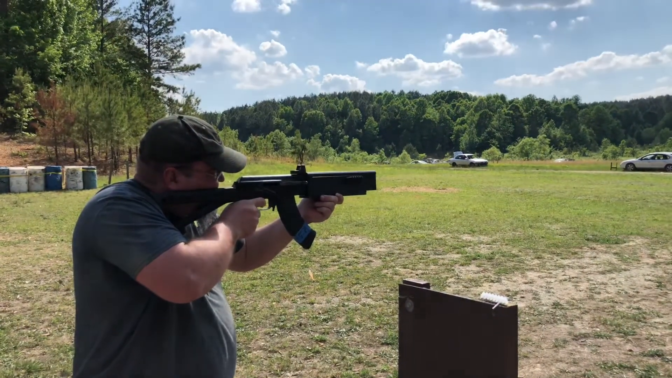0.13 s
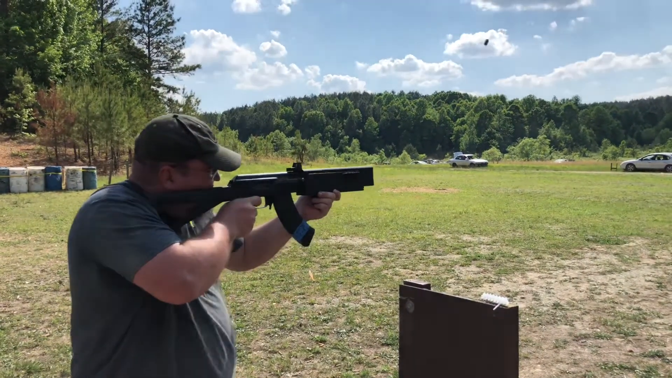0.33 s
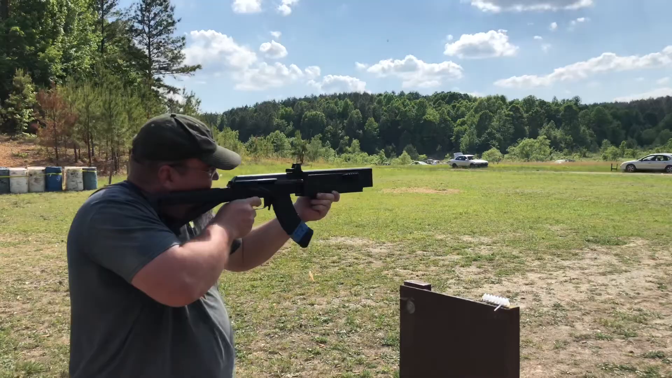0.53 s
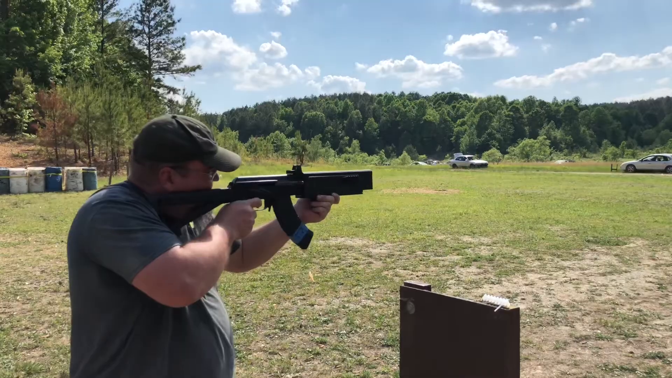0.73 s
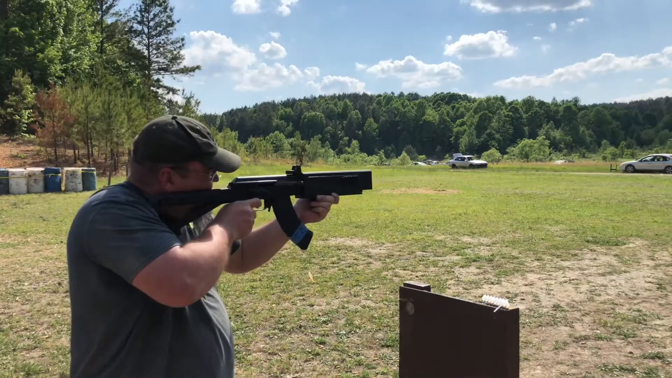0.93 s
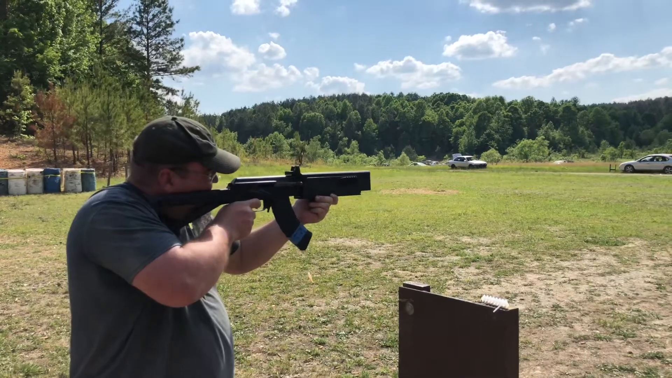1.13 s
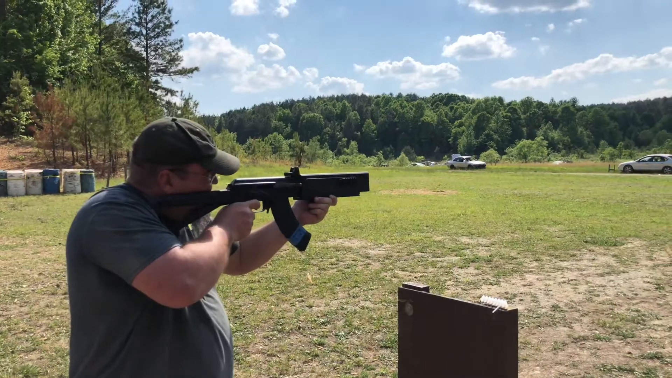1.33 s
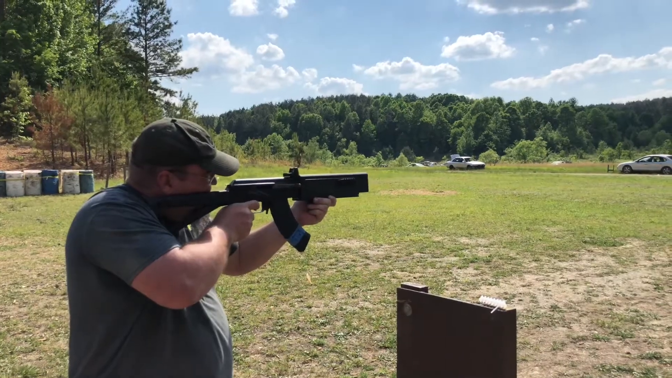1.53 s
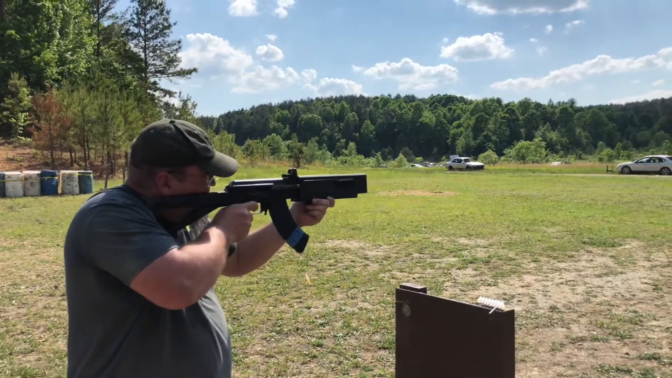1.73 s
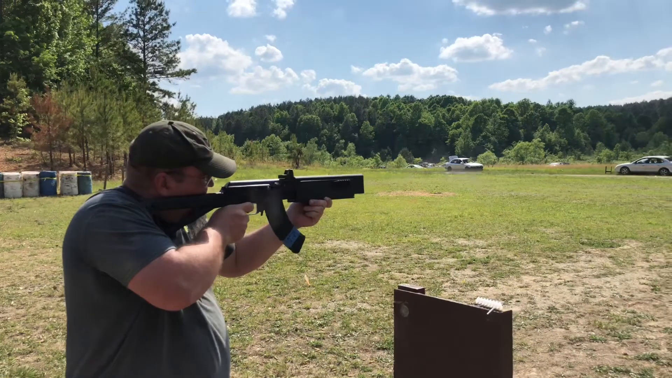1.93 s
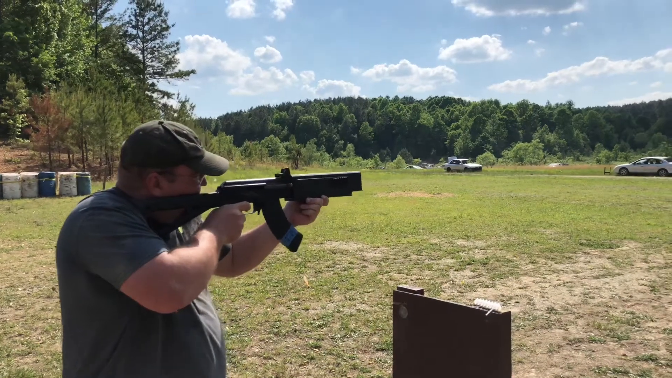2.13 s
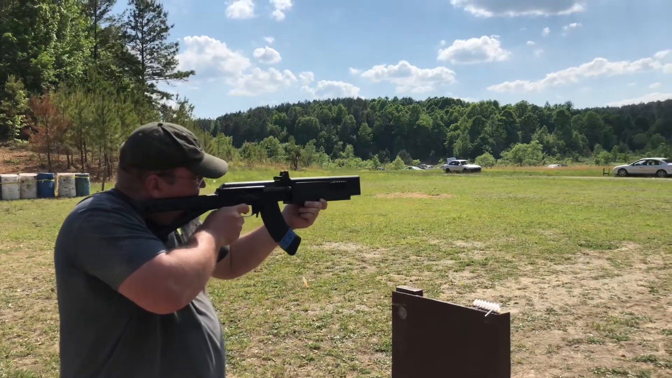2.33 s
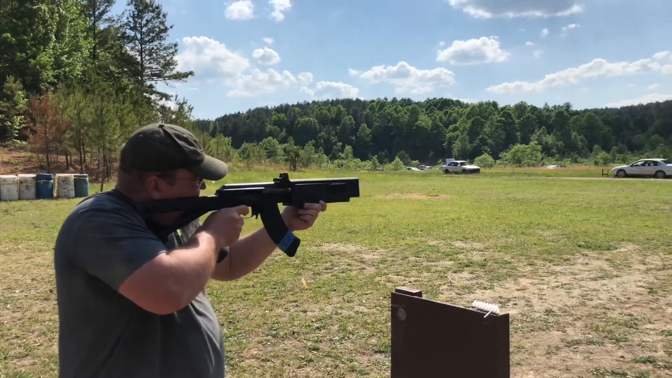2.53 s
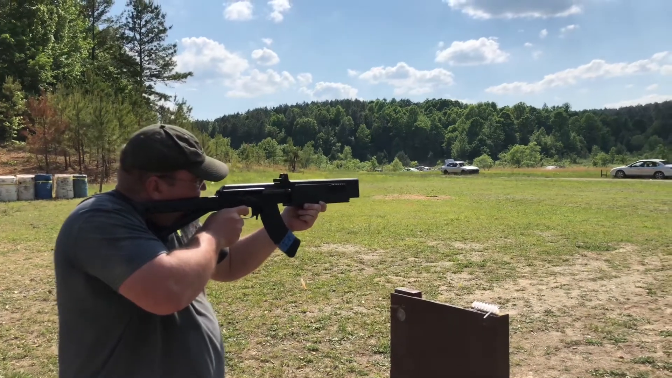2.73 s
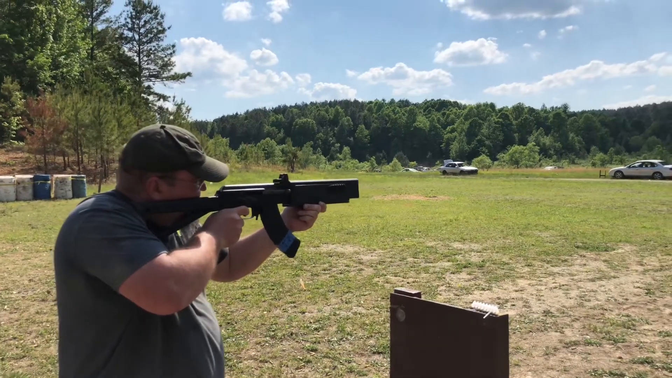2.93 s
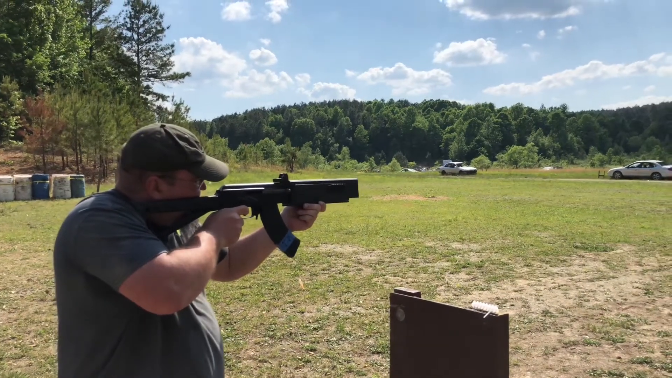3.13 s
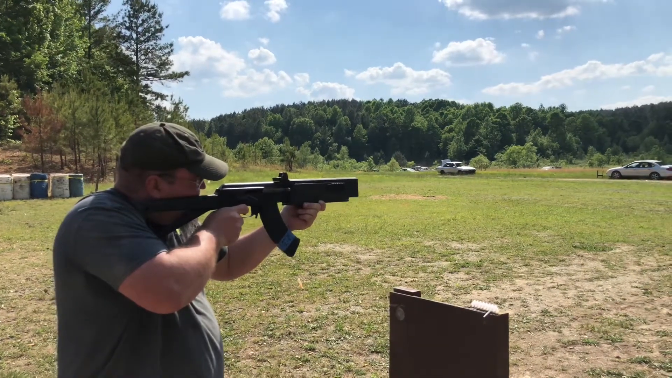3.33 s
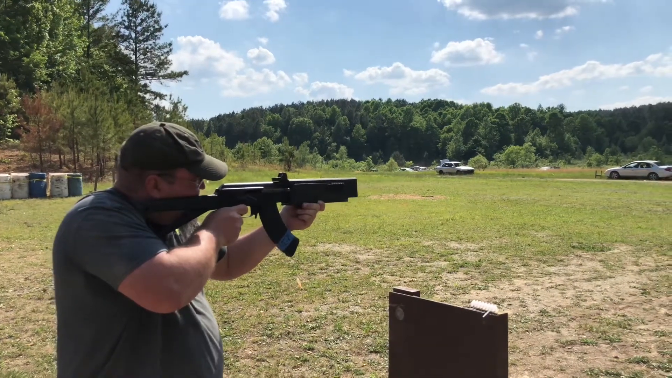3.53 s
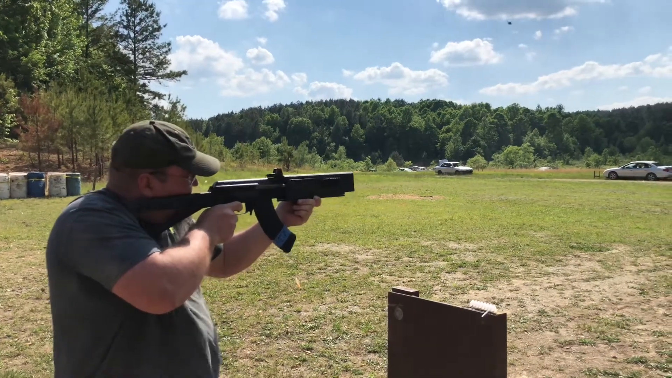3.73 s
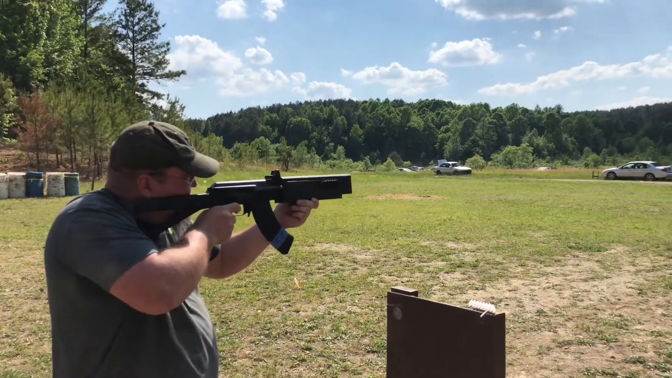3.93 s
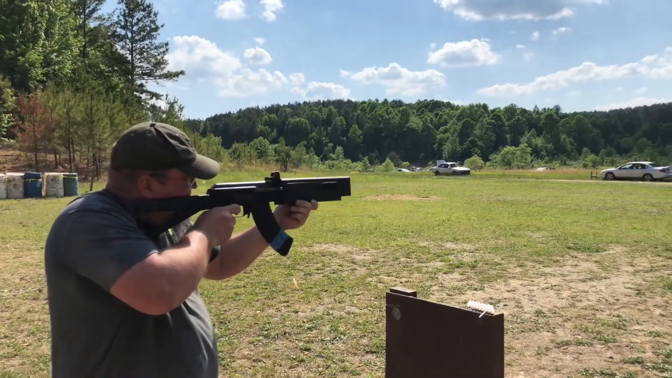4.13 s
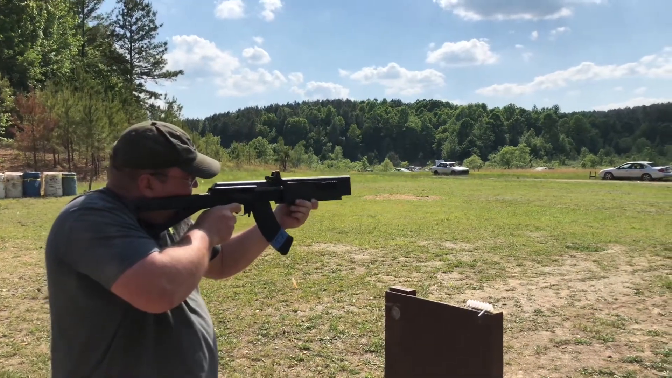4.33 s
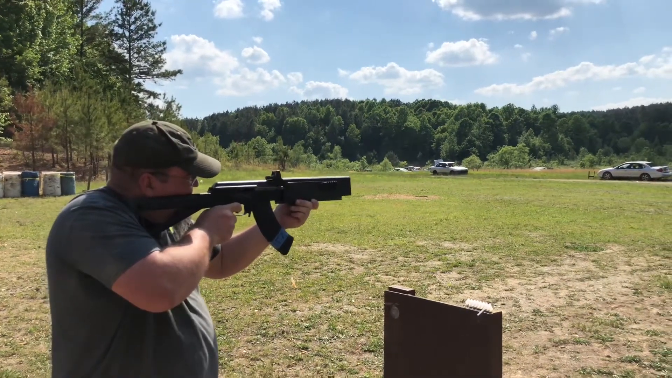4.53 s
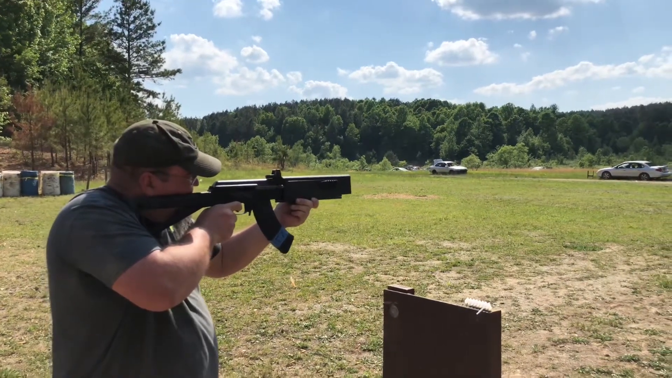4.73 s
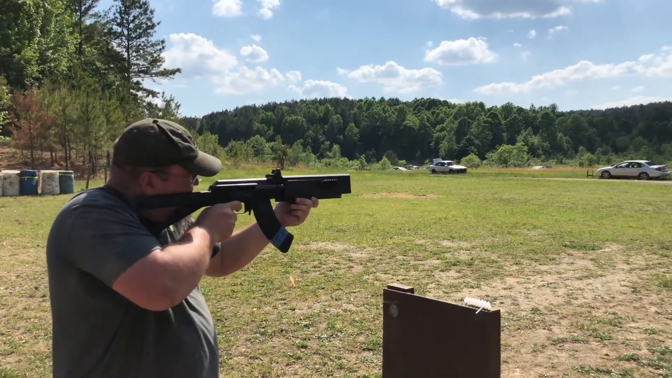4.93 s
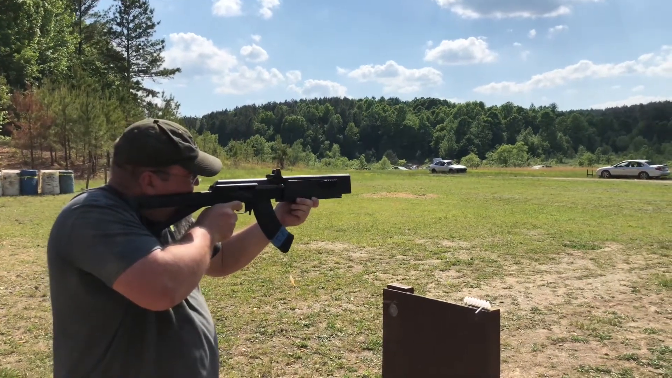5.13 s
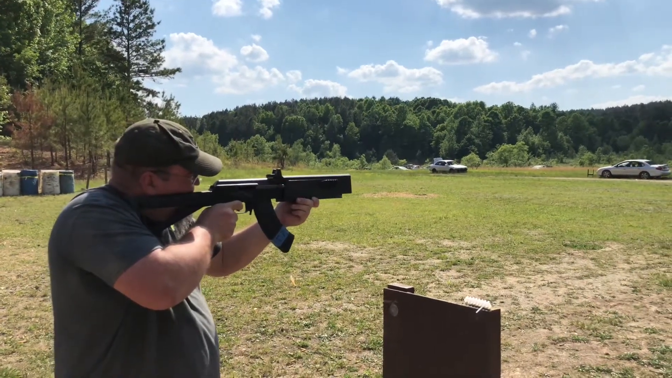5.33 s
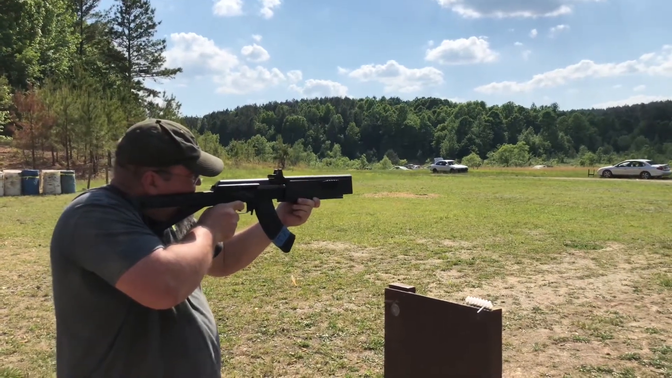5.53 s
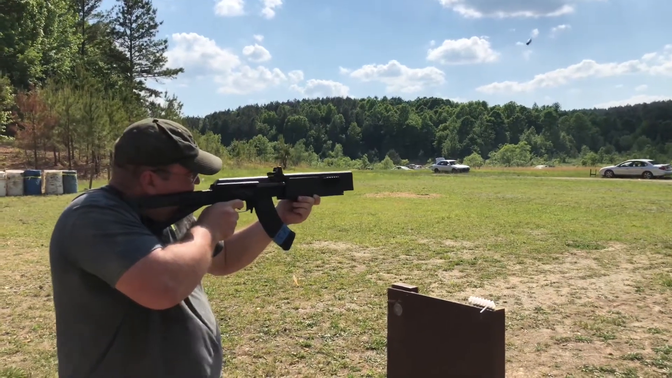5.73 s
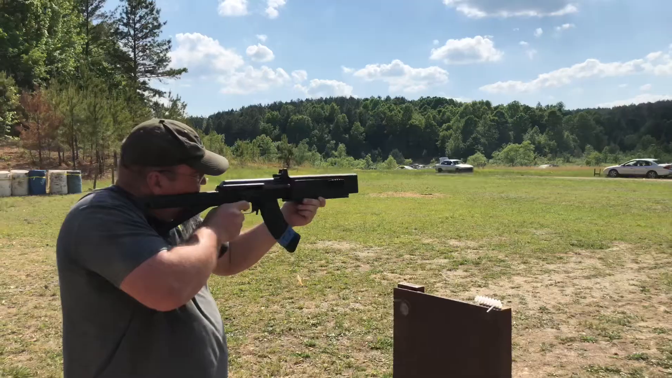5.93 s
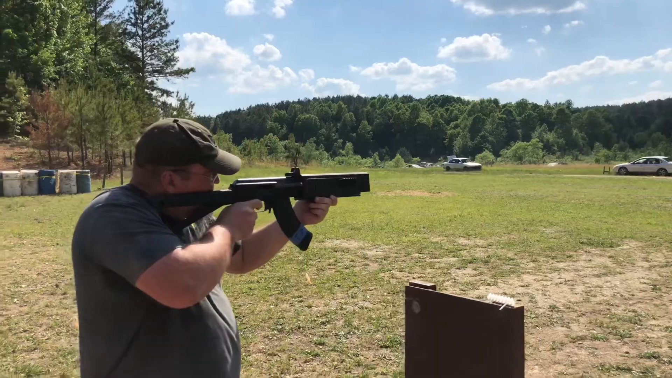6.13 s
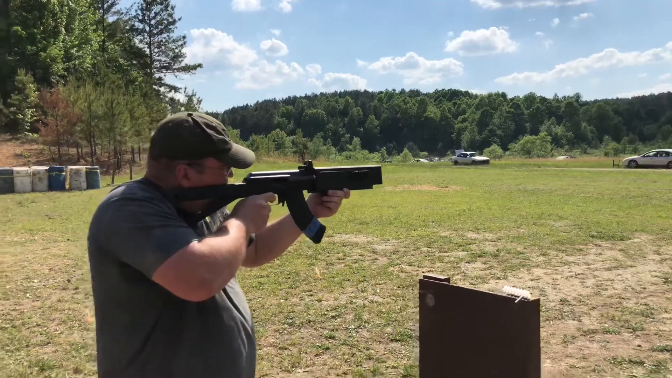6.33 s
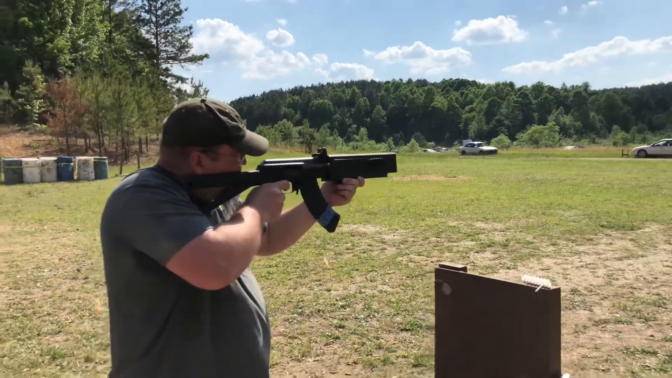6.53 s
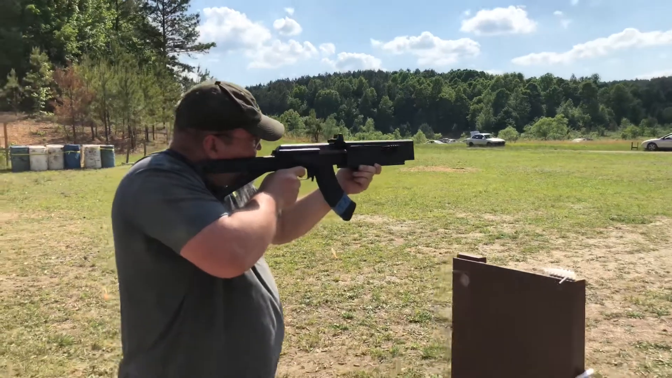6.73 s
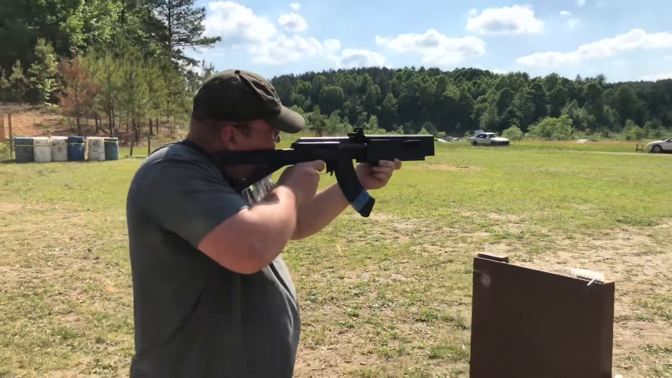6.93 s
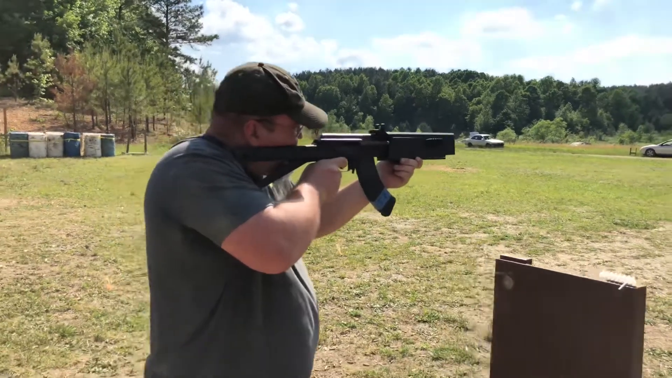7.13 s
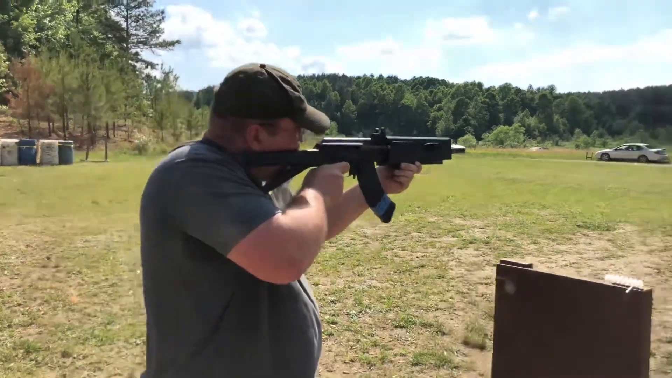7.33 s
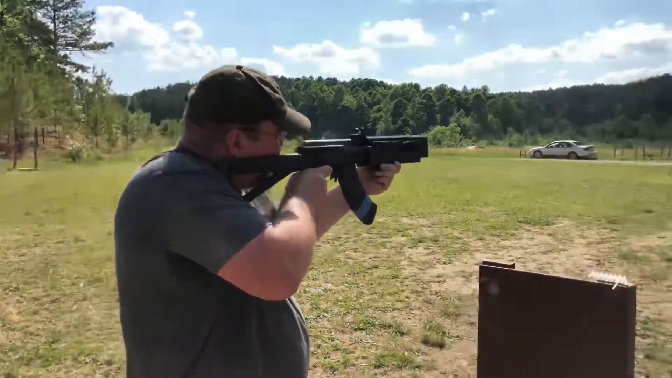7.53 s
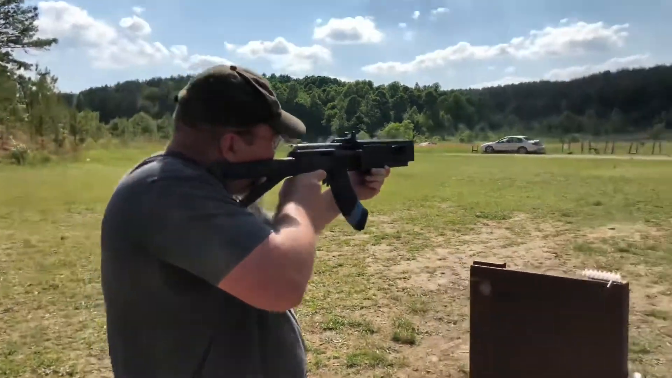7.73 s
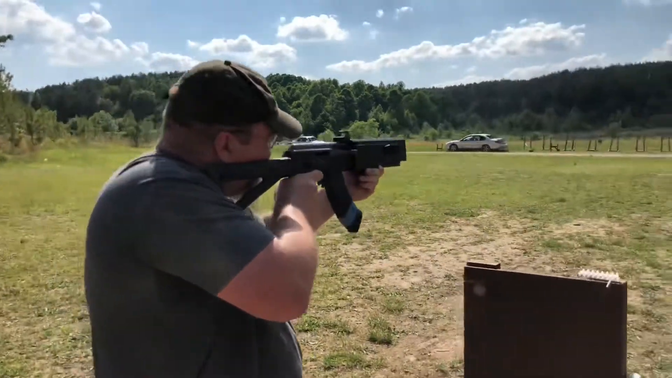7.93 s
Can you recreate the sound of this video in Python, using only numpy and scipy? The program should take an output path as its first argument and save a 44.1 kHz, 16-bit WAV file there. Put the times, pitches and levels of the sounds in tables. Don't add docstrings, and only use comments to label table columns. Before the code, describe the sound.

A silenced rifle fires five deliberate shots on a grassy range; metallic action clacks, echoes roll off distant trees, and wind thumps the microphone.

```python
import sys
import numpy as np
from scipy import signal
from scipy.fft import rfft, irfft
from scipy.io import wavfile
from scipy.ndimage import uniform_filter1d

SR = 44100
rng = np.random.default_rng(int(sys.argv[2]) if len(sys.argv) > 2 else 0)


def unload_audio(sound):
    columns = np.transpose(np.atleast_2d(sound))
    steps = np.round(np.clip(columns, -1, 1) * 32767)
    wavfile.write(sys.argv[1], SR, steps.astype(np.int16))


def boost(x):
    u = np.asarray(x, float) / 20
    return 10 ** u


N = 351918

# (time [s], blast level [dB], hammer level [dB], low push level [dB], push pitch [Hz])
SHOTS = [
    (0.3179, -8.5, -25, -26, 141),
    (2.0269, -8.5, -36.5, -23.5, 97),
    (3.6531, -10, -36.5, -20, 137.4),
    (5.6827, -12, -30, -25.5, 136),
    (7.4575, -9, -37, -18, 121),
]
# (frequency [Hz], level per Hz [dB])
STEEL = [(120, -56.5), (200, -36), (317, -16.5), (1130, -5.5), (1500, 0.5), (2160, -9.5), (4290, -2),
         (7460, -7), (8810, -6.5), (15300, -15.5), (16500, -35.5)]
# (frequency [Hz], level per Hz [dB])
MUZZLE = [(60, -29), (150, -9.5), (350, -8.5), (800, 1.5), (1250, 1), (1800, -3), (2600, -7.5),
          (5000, -28.5), (16000, -69)]
GRAIN_DB = 2.5


def evened(x):
    return x / np.sqrt(np.mean(x ** 2) + 1e-20)


def read(points, hz):
    f, value = np.transpose(points)
    return np.interp(np.log(hz + 1), np.log(f + 1), value)


def add(mix, s, sound):
    part = mix[round(s * SR):][:len(sound)]
    part += sound[:len(part)]


def hiss(length_s, spectrum, tilt_db=0., grain_db=0.):
    size = round(length_s * SR)
    hz = np.fft.rfftfreq(size, 1 / SR)
    grain = np.repeat(rng.uniform(-1.7, 1.7, size // 16 + 1), 16)[:size]
    raw = rng.standard_normal(size) * boost(grain_db * grain)
    colour_db = read(spectrum, hz) + tilt_db * np.log2((hz + 1) / 4000)
    return evened(irfft(rfft(raw) * boost(colour_db), size))


def struck(t, rise, t60):
    return np.clip(t / rise, 0, 1) * boost(-60 * np.maximum(t, 0) / t60)


def pulse(hz, cycles):
    u = np.linspace(-1.5, 1.5, round(cycles * 1.5 * SR / hz))
    return np.exp(-3 * u ** 2) * np.sin(np.pi * cycles * u)


def rifle():
    # (tree line level [dB], tree line pitch [factor], crack echo level [dB])
    carry = [
        (-1.5, 0.72, -1),
        (-2.5, 0.85, -0.5),
        (-1.5, 0.84, -0.5),
        (-1.5, 0.83, 0.3),
        (-7, 1.76, 0.34),
    ]
    crack_lags = [.017, 0, 0, 0, 0]
    end_rings = [0, 2, -2, -6, -4]
    share = .7
    out, trees = bolt(), woods()
    for (s, *blow), carried, lag_s, end_db in zip(SHOTS, carry, crack_lags, end_rings):
        add(out, s - .03, shot(*blow, end_db))
        answering = share * trees + np.sqrt(1 - share ** 2) * woods()
        add(out, s, landscape(answering, *carried, lag_s))
    return out


def shot(blast_db, hammer_db, push_db, push_hz, end_db):
    # (delay [s], level [dB])
    rattle = [
        (0, 1.5),
        (.003, -5),
        (.0065, -5),
        (.0095, -7.5),
        (.0115, -6),
    ]
    # (frequency [Hz], level per Hz [dB])
    blast = [(240, -16.5), (500, -4), (1780, -8), (3000, -3), (4400, -5), (6690, -4.5), (8450, -3),
             (10200, -5), (15300, -7), (16500, -26)]
    # (delay [s], peak level [dB], pitch
    # [Hz], length [cycles])
    rings = [(-.021, -30, 3998, 8), (-.0165, -33, 3300, 8), (-.012, -28, 2900, 9), (-.005, -24, 3000, 16),
             (.002, -9, 4430, 20), (.0022, -14, 3100, 12), (.0025, -12.5, 8040, 30), (.007, -12, 3500, 8),
             (.0115, -9, 2850, 11), (.0135, -13, 3050, 10), (.0172, -10.5, 2650, 13),
             (.0225, -27.5, 2900, 16)]
    hammer_s, primer_s, primer_db = -.0225, -.0092, -4.5
    puff_db, puff_rise_s, puff_t60_s = -8, .0077, .084
    t = np.arange(round(.25 * SR)) / SR - .03

    ticks = sum(boost(db + 2.5 * rng.standard_normal()) * struck(t - hammer_s - delay, .0005, .011)
                for delay, db in rattle)
    ticks = ticks + .15 * (t > hammer_s) * (t < 0)
    out = boost(hammer_db + 4) * hiss(.25, STEEL, tilt_db=1.0, grain_db=GRAIN_DB) * ticks

    gas = struck(t + .0013, .0014, .074) * np.clip((.027 - t) / .0084, .25, 1)
    gas += boost(primer_db - 9.5) * struck(t - primer_s, .0028, .035) * (t < 0)
    out += boost(blast_db + 4) * hiss(.25, blast, grain_db=GRAIN_DB) * gas
    out += boost(blast_db + puff_db) * hiss(.25, MUZZLE) * struck(t + .0051, puff_rise_s, puff_t60_s)

    for (delay, db, hz, cycles), (vary, drift) in zip(rings, rng.standard_normal((len(rings), 2))):
        ring_hz = hz * (1 + .037 * drift)
        ring_db = db + 1.2 * vary + end_db * (delay > .015)
        add(out, .03 + delay - .75 * cycles / ring_hz, boost(ring_db) * pulse(ring_hz, cycles))

    sag_hz = push_hz * (.45 + 5.1 * np.exp(-np.maximum(t, 0) / .011))
    swing = np.sin(2 * np.pi * np.cumsum(sag_hz * (t > .002)) / SR)
    return out + boost(push_db + 9.5) * swing * struck(t, .019, .077)


def bolt():
    # (delay [s], peak level [dB], tilt [dB per octave], t60 [s])
    stroke = [
        (0.0261, -19, 4, .07),
        (.031, -17, -1, 0.068),
        (0.0518, -14.5, 1, 0.026),
        (0.061, -21.5, 3.5, .03),
        (.0745, -8, 4.5, .035),
        (0.082, -10, 1.5, 0.028),
        (.094, -19, 2.5, 0.067),
    ]
    # (stroke vigour [dB], slide level [dB], slam level [dB])
    cycles = [
        (0, 2, -13),
        (4, 1.5, -8.5),
        (2, 2, -12.5),
        (-0.5, 2, -11.5),
        (1, 2.5, -9.5),
    ]
    home_delays = [.15, .1332, .1405, .117, .1128]
    home_tilt_db, home_t60_s = 2, .04
    slide_from_s, slide_to_s, slide_from_db, slide_to_db = .045, .0791, -24.5, -24
    out, t = np.zeros(N), np.arange(round(.12 * SR)) / SR
    span = slide_to_s - slide_from_s
    scrape_db = np.interp(t, [0, span], [slide_from_db, slide_to_db]) - 3500 * np.maximum(t - span, 0)
    for (s, *_), (vigour_db, slide_db, home_db), home_s in zip(SHOTS, cycles, home_delays):
        slam = (home_s, home_db - vigour_db, home_tilt_db, home_t60_s)
        for delay, db, tilt_db, t60 in stroke + [slam]:
            knock = hiss(.12, STEEL, tilt_db, GRAIN_DB) * struck(t, .0008, t60)
            add(out, s + delay, boost(db + vigour_db - 9.0) * knock)
        scrape = np.clip(t / .0031, 0, 1) * hiss(.12, STEEL, grain_db=GRAIN_DB)
        add(out, s + slide_from_s, boost(scrape_db + slide_db) * scrape)
    return out


def landscape(clicks, line_gain_db, line_pitch, crack_gain_db, lag_s):
    # (delay [s], level [dB], build-up [s], fade [dB per s])
    muzzle_stands = [(.02, -32, 0.023, 248), (.123, -26, 0.0076, 198), (.19, -30.5, 0.15, 500),
                     (.21, -34.5, 0.032, 45), (.31, -41.5, 0.088, 56.5), (.5, -49, .2, 7),
                     (1.7, -49, .2, 41), (2, -59, .3, -0.8)]
    # (delay [s], level [dB], build-up [s], fade [dB per s], treble loss [dB per octave])
    crack_stands = [(.02, -30.5, .02, 36.5, 4), (.123, -29.5, 0.019, 62.5, 5),
                    (0.204, -25.5, 0.023, 198, 7.5), (.32, -37, 0.091, 77, 10), (.44, -61, 0.08, 57, 3),
                    (0.731, -51, .03, 8.5, 9.5), (1.26, -51, 0.065, 14, 14.5), (1.449, -50, 0.18, 32.5, 16),
                    (2, -51.5, 0.32, 8.5, 31)]
    # (frequency [Hz], level per Hz [dB])
    crack_colour = [(400, -36), (1200, -30.5), (2000, -1), (2900, 0.5), (3700, -3), (5000, -0.5), (8000, 1),
                    (14000, 3), (16500, -6.5)]
    # (delay [s], gain [dB], centre [Hz])
    clumps = [(.441, 4.5, 2810), (.635, -1, 2500), (.722, 12, 6000), (.736, 9.5, 6070), (.507, 2, 6000),
              (.787, 13, 2200), (.803, 7, 3480), (.846, 11.5, 2700), (.815, 7, 7030), (1.003, 10, 2850),
              (1.036, 8, 2700), (.99, 6, 6240), (1.075, 9.5, 2300), (1.105, 19, 2300), (1.17, -6, 4000),
              (1.184, -18, 3470), (1.198, -8, 3980), (0.691, 6, 5900), (.95, -4, 3000), (1.243, 9, 2800),
              (1.276, 1, 2300)]
    # (delay [s], level [dB], pitch [factor])
    tree_line = [(1.17, -59.5, 1.5), (1.25, -51.5, 1.65), (1.31, -45.5, 1.55), (1.4, -41, 1.4),
                 (1.5, -42.5, 1.3), (1.699, -42, 1.25), (2, -46, 1), (2.6, -66.5, 0.62),
                 (3.401, -68.5, 0.52)]
    # (frequency [Hz], level per Hz [dB])
    far_colour = [(250, -34.5), (550, -8.5), (780, -2.5), (1000, 3.5), (1500, 2.5), (2000, -2), (2700, -16),
                  (4000, -17), (16000, -70)]
    # (delay [s], peak level [dB], pitch [Hz], length [cycles])
    echoes = [(0.127, -13.5, 1000, 1.3), (.133, -20.5, 990, 3.3), (0.143, -16, 7000, 4.1),
              (0.142, -10.5, 2700, 2.4), (0.143, -31, 162, 1.8), (.143, -16, 900, 1.4),
              (.169, -24, 1000, 2.9), (.18, -23, 900, 3), (.222, -26, 2800, 4.6), (.193, -25, 1100, 2),
              (.1995, -14, 4500, 3), (0.204, -17, 2870, 5.2), (0.2101, -14, 3200, 5.3),
              (0.215, -15, 3000, 4), (0.26, -25, 3360, 5), (.26, -35, 5500, 8)]
    deeper_db_per_s = 10
    patch_db, patch_bins, patch_frames = 1.5, 3, 9

    hz, t, (low, high, far) = signal.stft(clicks, SR, nperseg=256, noverlap=192)
    late = t - lag_s * np.clip((t - .5) / .2, 0, 1)
    muzzle, crack = scattered(muzzle_stands, t), scattered(crack_stands, late)
    muzzle_db, crack_db = 10 * np.log10(muzzle.sum(0)), 10 * np.log10(crack.sum(0))
    near, *_, dull_db = np.transpose(crack_stands)[:, :, None]
    dull_db = dull_db + deeper_db_per_s * np.maximum(t - near, 0)
    loss_db = (dull_db * crack).sum(0) / crack.sum(0)
    for at, db, clump_hz in clumps:
        colour = np.exp(-np.log2((hz + 1) / clump_hz) ** 2)
        moment = np.exp(-((late - at) / .005) ** 2)
        crack_db = crack_db + (db + 1.7 * rng.standard_normal()) * np.outer(colour, moment)
    delay, line_db, pitch = np.transpose(tree_line)
    line_db = np.interp(t, delay, line_db, left=-120) + line_gain_db
    line_hz = hz[:, None] / (np.interp(t, delay, pitch) * line_pitch)
    air_loss_db = np.outer(np.maximum(np.log2((hz + 1) / 3000), 0) ** 1.64, loss_db)

    z = low * boost(read(MUZZLE, hz)[:, None] + muzzle_db + 10.5)
    z += high * boost(read(crack_colour, hz)[:, None] + crack_db + crack_gain_db + 6.5 - air_loss_db)
    z += far * boost(read(far_colour, line_hz) + line_db + 11.5)
    patches = rng.standard_normal(z.shape[::-1]).T
    patches = uniform_filter1d(uniform_filter1d(patches, patch_bins, 0), patch_frames, 1)
    z *= boost(patch_db * evened(patches) - 1)
    back = signal.istft(z, SR, nperseg=256, noverlap=192)[1]
    for delay, db, echo_hz, cycles in echoes:
        echo = boost(db + .38 * rng.standard_normal()) * pulse(echo_hz, cycles)
        add(back, delay - cycles * .708 / echo_hz, echo)
    return back


def scattered(stands, t):
    at, db, rise, fade_db = np.transpose(stands)[:4, :, None]
    return boost(db - 20 * np.maximum(at - t, 0) / rise - fade_db * np.maximum(t - at, 0)) ** 2


def woods():
    return np.array([trunks(2500, 1.9), trunks(6000, 2.5), trunks(1400, 2.2)])


def trunks(per_s, spread_db):
    rows_db = 1.2
    size = round(3.4 * SR)
    clicks = boost(spread_db * np.minimum(rng.exponential(1, size), 3.2)) * (rng.random(size) < per_s / SR)
    rows = evened(uniform_filter1d(uniform_filter1d(rng.standard_normal(size), 200), 200))
    return evened(clicks * rng.choice([-1., 1.], size) * boost(rows_db * rows))


def glints():
    # (time [s], peak level [dB], pitch [Hz])
    flicks = [(.008, -37, 400), (.027, -40, 750), (.074, -38, 560), (.104, -42, 600), (.123, -42, 850),
              (.145, -41, 700), (.205, -38, 560), (.22, -34, 540), (.226, -39, 790), (.252, -31, 510),
              (.281, -42, 600), (.5217, -15, 7200), (1.44, -34, 1900), (1.482, -41, 2200),
              (3.13, -33, 2060), (3.266, -33, 560), (4.927, -35, 2200), (7.143, -32, 1700)]
    out = np.zeros(N)
    for s, db, hz in flicks:
        add(out, s - 3 / hz, boost(db) * pulse(hz, 4))
    return out


def cases():
    # (time [s], peak level [dB], ring pitch [Hz], ring t60 [s], click against ring [dB])
    ringing = [
        (1.512, -42, 12780, 0.074, -8),
        (3.202, -49.5, 12980, 0.059, 0),
        (4.7884, -67, 12240, 0.052, -1.5),
        (5.1637, -64, 12300, 0.054, -1),
        (5.395, -76, 12200, 0.06, -5.5),
    ]
    # (time [s], peak level [dB], ring pitch [Hz], ring t60 [s], click against ring [dB])
    dull = [(1.249, -59, 11600, 0.0062, 3), (3.5794, -64, 13200, 0.0037, 2.7),
            (6.7999, -59, 12900, 0.005, 3.7)]
    click_colour = [(2500, -30), (6000, -7), (13000, -7.0), (16500, -3.5)]  # (Hz, dB per Hz)
    out, t = np.zeros(N), np.arange(round(.15 * SR)) / SR
    for s, db, hz, t60, click_db in ringing + dull:
        ring = np.sin(2 * np.pi * hz * t) + .5 * np.sin(2 * np.pi * (hz + 55) * t)
        click = hiss(.15, click_colour) * struck(t, .00025, .012)
        add(out, s, boost(db) * (ring * struck(t, .00072, t60) + boost(click_db) * click))
    return out


def birds():
    # (time [s], pitch [Hz], level [dB])
    calls = [
        [(0, 4200, -69), (.035, 4200, -70)],
        [(0, 5600, -53), (.008, 7200, -53)],
        [(.008, 5330, -54), (.022, 7350, -46)],
        [(.024, 5640, -51), (.038, 4800, -48), (.053, 2400, -58)],
        [(.058, 2444, -31), (.075, 3500, -58), (.095, 4096, -46), (.14, 4230, -53), (.18, 4164, -63),
         (.295, 4200, -69)],
        [(1.18, 5230, -72), (1.22, 5610, -68), (1.245, 6760, -69)],
        [(1.46, 5330, -70.5), (1.5, 5780, -62), (1.53, 6700, -54)],
        [(1.608, 5870, -64.5), (1.622, 9040, -73.5), (1.632, 7200, -68), (1.655, 6100, -56), (1.68, 5500, -60)],
        [(1.745, 4300, -63.5), (1.764, 5180, -54.5), (1.78, 4480, -59.5)],
        [(1.892, 5700, -64), (1.905, 9000, -79), (1.915, 7040, -61), (1.94, 6000, -54), (1.97, 5520, -60)],
    ]
    # (time [s], pitch [Hz], level [dB])
    far_call = [(.06, 1800, -80), (.1, 1760, -74.5), (.14, 1700, -83), (.19, 1770, -73.5),
                (.24, 1650, -81.5)]
    # (time [s], pitch [Hz], level [dB])
    trill = [(.235, 7260, -72.5), (.25, 7285, -56.5), (.272, 7200, -54.5), (.284, 6000, -49.5),
             (.297, 5300, -48.5)]
    trill_hz, trill_depth_hz = 130, 700
    out = np.zeros(N)
    for rows in calls + [far_call, trill]:
        s, hz, db = np.transpose(rows)
        t = np.arange(s[0], s[-1], 1 / SR)
        pitch = np.interp(t, s, hz)
        if rows is trill:
            depth = trill_depth_hz * np.clip((s[3] - t) / .02, .15, 1)
            pitch = pitch + depth * np.sin(2 * np.pi * trill_hz * t)
        whistle = np.sin(2 * np.pi * np.cumsum(pitch) / SR) * signal.windows.tukey(len(t), .2)
        add(out, s[0], boost(np.interp(t, s, db)) * whistle)
    flutter = evened(uniform_filter1d(rng.standard_normal(N), 350))
    out = out * boost(3.5 * flutter - 1.5)
    t = np.arange(SR // 4) / SR
    leaves = rng.standard_normal(len(t)) * struck(t, .01, .43)
    return out + boost(-8.0) * signal.fftconvolve(out, leaves / np.linalg.norm(leaves))[:N]


def wind():
    # (start [s], length [s], level [dB], brightness [dB per octave])
    gust_table = [(.0, 0.14, -35, 2.5), (0.212, 0.14, -31, 1), (0.422, 0.2, -38, 8.5),
                  (0.736, 0.061, -46, 6), (1.17, 0.094, -51.5, 1.5), (1.33, 0.057, -54, 4),
                  (1.473, 0.031, -61, 5), (1.58, 0.18, -49.5, -0.5), (1.896, 0.14, -46, -0.5),
                  (2.123, 0.37, -53, 0.5), (2.583, .05, -49.5, -11), (2.761, 0.082, -47, -10),
                  (3.075, 0.37, -38, -4), (3.505, 0.18, -40.5, -3.5), (3.76, 0.24, -45, -4.5),
                  (4.356, 0.053, -37, -3), (4.65, 0.084, -42.5, -4.5), (4.811, .25, -42, -8.5),
                  (4.904, 0.036, -38, 0.5), (5.083, 0.037, -37, 1.5), (5.195, 0.041, -33.5, -5),
                  (5.318, 0.17, -31.5, -2.5), (5.533, 0.14, -31, -3.5), (5.81, 0.036, -33.5, -5),
                  (5.894, 0.25, -49.5, -3.5), (6.234, 0.18, -56.5, -8.5), (6.545, 0.057, -47.5, -4),
                  (6.676, 0.041, -39.5, -4.5), (6.834, 0.11, -44, -8), (7.049, 0.2, -36, -9)]
    # (frequency [Hz], level per Hz [dB])
    gust_colour = [(20, -30), (32, -17.5), (50, -9), (80, 1.5), (140, -4), (220, -4), (400, -13),
                   (800, -34), (1600, -74)]
    # (time [s], peak level [dB], pitch [Hz])
    pops = [(0.025, -23.5, 138), (0.072, -36, 129), (0.122, -27.5, 448), (0.146, -33, 188),
            (0.201, -28, 221), (0.222, -22, 150), (0.249, -25, 284), (0.767, -35, 227), (1.225, -43, 156.5),
            (1.334, -43, 172.6), (1.762, -43, 175), (1.973, -34, 258.7), (3.076, -38.5, 156),
            (3.26, -34, 168.5), (3.304, -29.5, 283), (3.333, -30.5, 150), (3.393, -34, 137),
            (3.52, -29, 155), (3.585, -37, 132), (4.375, -28.5, 132.8), (4.646, -37.5, 152),
            (5.104, -28, 130.5), (5.311, -34, 151), (5.333, -22, 145.3), (5.42, -34, 122.4),
            (5.436, -22, 141.3), (6.723, -29, 139), (7.103, -28, 115), (7.153, -27, 253.6),
            (7.225, -35, 112)]
    rise_db_per_s, fall_db_per_s = 299, 250
    lull_db, lull_bright_db = -65.5, .5
    frames, hz = N // 128 + 9, np.fft.rfftfreq(1024, 1 / SR)
    t = np.arange(frames) * 128 / SR
    s, length, db, bright_db = np.transpose(gust_table)[:, :, None]
    before, after = np.maximum(s - t, 0), np.maximum(t - s - length, 0)
    gusts = boost(db - rise_db_per_s * before - fall_db_per_s * after) ** 2
    lull = boost(lull_db) ** 2
    power = gusts.sum(0) + lull
    a, b = rng.standard_normal((frames, 513, 2)).T
    brightness = ((gusts * bright_db).sum(0) + lull_bright_db * lull) / power
    reach_db = np.outer(np.log2((hz + 40) / 100), brightness)
    spectrum = (a + 1j * b) * boost(read(gust_colour, hz)[:, None] + reach_db)
    rumble = signal.istft(spectrum, nperseg=1024, noverlap=896)[1][:N]
    rumble /= np.sqrt(uniform_filter1d(rumble ** 2, 6000) + 1e-20)
    swell = evened(uniform_filter1d(uniform_filter1d(rng.standard_normal(N), 500), 500))
    lumps = boost(4.5 * np.minimum(swell, 1.4))
    strength = np.interp(np.arange(N) / SR, t, np.sqrt(power))
    out = strength * boost(-3.0) * rumble * evened(lumps)
    for (at, pop_db, pop_hz), sign in zip(pops, rng.choice([-1., 1.], len(pops))):
        add(out, max(at - .665 / pop_hz, 0), sign * boost(pop_db + 1.0) * pulse(pop_hz, 2.077))
    return out


def field():
    # (frequency [Hz], level per Hz [dB])
    air_colour = [(600, -25.5), (1100, -4), (1800, -7), (2600, -8), (4200, -2.5), (6500, -7), (9000, -31),
                  (13000, -29), (16500, -39)]
    return boost(-70) * hiss(N / SR, air_colour)[:N]


def scene():
    return (rifle() + glints() + cases() + birds() + wind() + field())[None]


def band_limit(x):
    return signal.sosfilt(signal.butter(12, 16970, fs=SR, output="sos"), x)


def record(dry):
    port = signal.sosfilt(signal.butter(2, 40, "high", fs=SR, output="sos"), dry)
    limited = 1.06 * np.tanh(port / 1.105)
    edge = signal.firwin(401, 15950, window=("kaiser", 8), fs=SR)
    return band_limit(signal.oaconvolve(limited, edge[None], "same"))


dry = scene()
out = record(dry)
unload_audio(out)
```